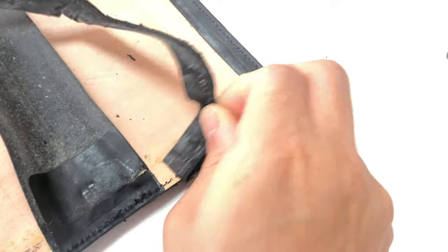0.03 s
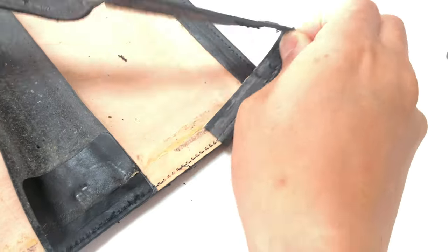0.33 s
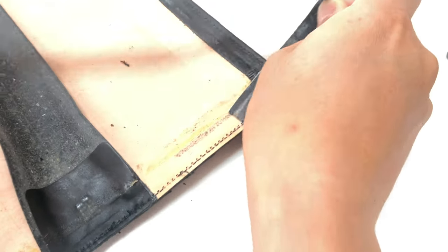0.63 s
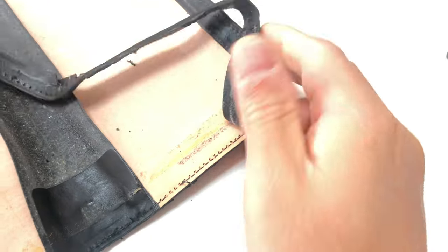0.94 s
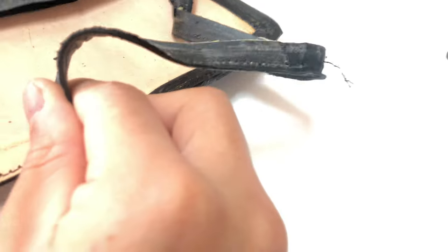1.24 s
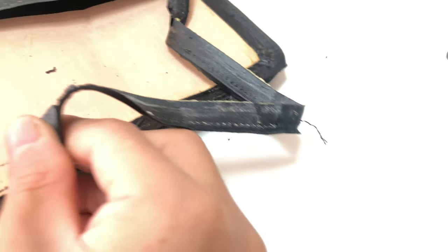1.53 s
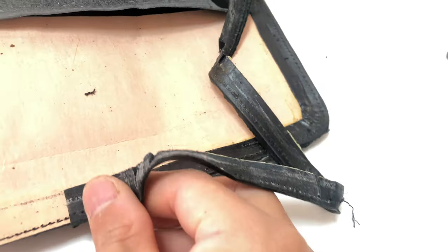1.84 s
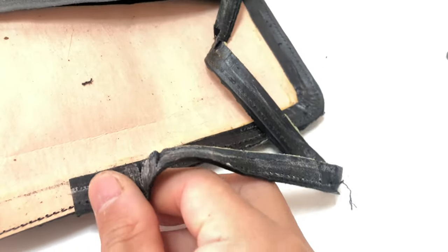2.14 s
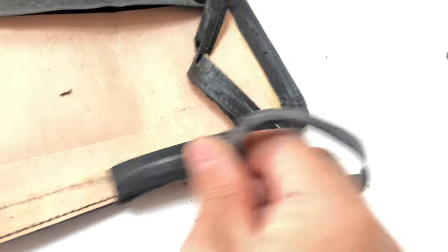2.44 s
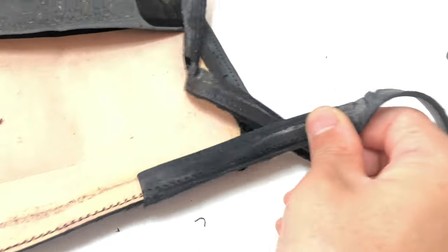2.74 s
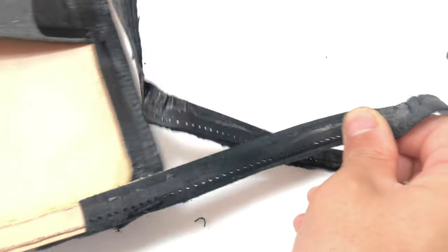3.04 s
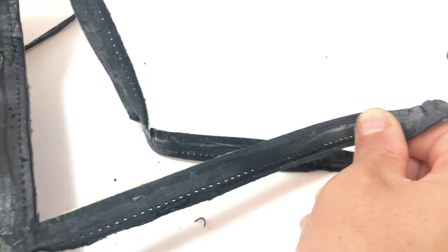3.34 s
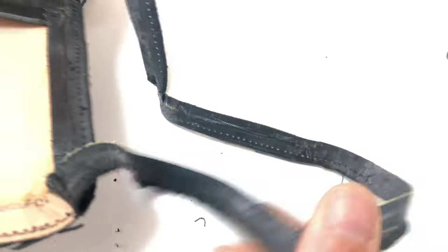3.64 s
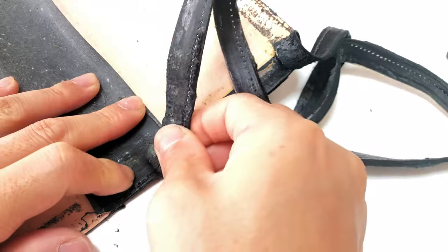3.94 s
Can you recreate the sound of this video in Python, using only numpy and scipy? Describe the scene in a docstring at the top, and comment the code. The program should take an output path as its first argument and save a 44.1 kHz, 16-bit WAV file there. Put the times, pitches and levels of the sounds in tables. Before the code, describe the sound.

Glued edging peels off a leather panel, close up, starting with faint crackling and a few sharp clicks. From about 0.6 to 2 seconds, hands slide and rub softly over the leather with dull bumps. A quick fizzing rip comes at 2.4 seconds, then crackling tugs with sharp snaps, loudest from 3 to 3.2. Soft sliding follows, and a table knock near 4 seconds. Low handling rumble comes and goes.

```python
"""At a work table, close to the microphone, hands peel a glued edging strip off a leather panel.
The glue fails fibre by fibre, in a fizzing rip and then in crackling tugs with sharp snaps, and these
impulses excite the panel's hollow modes. Between pulls, sliding friction of hands and leather gives a
soft hiss. Knocks set the table ringing, and the handling shakes the microphone into a low rumble."""
import sys
import numpy as np
from scipy import signal
from scipy.fft import rfft, irfft
from scipy.io import wavfile
from scipy.ndimage import uniform_filter1d

SR = 44100
rng = np.random.default_rng(int(sys.argv[2]) if len(sys.argv) > 2 else 0)


def transcribe(u):
    """Save the signal u as a 16-bit wav file named by the first command-line argument.

    u: samples, shape (n,) or (channels, n), limited to [-1, 1]; the rate is SR.
    q: integer samples, one column per channel.
    """
    v = np.clip(np.atleast_2d(u).T, -1, 1)
    q = np.round(v * 32767).astype(np.int16)
    wavfile.write(sys.argv[1], SR, q)


N = 176400
T = np.arange(N) / SR


def amp(db):
    """Decibels to gain."""
    return 10 ** (np.asarray(db) / 20)


def unit(x):
    """Scales to rms 1."""
    return x / np.sqrt(np.mean(x ** 2) + 1e-20)


def read(points, hz):
    """Reads a table on a log-frequency axis."""
    f, value = np.transpose(points)
    return np.interp(np.log(hz + 1), np.log(f + 1), value)


def level(rows, axis=1):
    """Gain along a dB curve, fading quickly outside it."""
    c = np.transpose(rows)
    outside = np.maximum(c[0, 0] - T, 0) + np.maximum(T - c[0, -1], 0)
    return amp(np.interp(T, c[0], c[axis])) * np.exp(-outside / 0.041)


def add(mix, s, sound):
    """Mixes a sound in at a time."""
    part = mix[max(round(s * SR), 0):][:len(sound)]
    part += sound[:len(part)]


def colour(x, points):
    """Causal filter with the given spectrum."""
    size = 16384
    log_gain = np.log(amp(read(points, abs(np.fft.fftfreq(size, 1 / SR)))))
    taps = np.fft.ifft(np.exp(np.conj(signal.hilbert(log_gain)))).real[:size // 2]
    return signal.fftconvolve(x, taps)[:len(x)]


def wander(hz):
    """Slow chance of rms 1, up to the given rate."""
    return unit(irfft(rfft(rng.standard_normal(N)) / (1 + (np.fft.rfftfreq(N, 1 / SR) / hz) ** 4), N))


def fibres(per_s, spread_db, clump_db, clump_hz):
    """Poisson process: random clicks of uneven size, swelling and sinking in clumps."""
    size_db = spread_db * np.minimum(rng.exponential(1, N), 4)
    size_db += clump_db * np.clip(wander(clump_hz), -2, 2)
    return amp(size_db) * rng.choice([-1., 1.], N) * (rng.random(N) < per_s / SR)


def stroke(peak, rise, fall, db, flatness=2.2):
    """Bell-shaped envelope: a swell and a fade; flatness above 2 holds the top longer."""
    width = np.where(T < peak, rise, fall)
    return amp(db) * np.exp(-0.75 * abs((T - peak) / width) ** flatness)


# Envelopes of the three pulls (time [s], crackle level [dB], flexing level [dB])
LOOSEN_ENVELOPE = [(0.0, -53.5, -51.5), (0.064, -52.5, -55), (0.088, -51.5, -42), (0.304, -56, -67),
                   (0.366, -52, -52.5), (0.442, -56, -58), (0.466, -55, -46), (0.6, -70, -71)]
RIP_ENVELOPE = [(2.332, -63.5, -64), (2.386, -53.5, -49), (2.408, -47.5, -54), (2.48, -39, -61),
                (2.568, -61.5, -80), (2.598, -63, -45), (2.64, -74, -64)]
TUG_ENVELOPE = [(2.666, -57, -71), (2.728, -46.5, -47), (2.762, -46, -46.5), (2.83, -54, -60),
                (2.934, -57, -79), (3.002, -45, -41.5), (3.078, -47, -52), (3.11, -55.5, -73),
                (3.132, -54.5, -67), (3.14, -49, -33.5), (3.156, -48, -39.5), (3.218, -47.5, -62),
                (3.33, -69, -88)]
# Spectra of each pull's crackle and of the flexing panel (frequency [Hz], level [dB])
LOOSEN_SPECTRUM = [(300, -8), (1000, -8), (1550, -8), (2050, 0.5), (3000, -6.5), (4200, -6.5), (7500, -8.5),
                   (11000, -21), (16000, -39)]
RIP_SPECTRUM = [(180,-13), (400,-9), (950,-9.5), (1800,-8), (2300,-1.5), (2900,-4.5), (3800,-7.5),
                (5500,-4), (7600,-8), (10500,-15.5), (13700,-19.5), (16000,-27)]
TUG_SPECTRUM = [(180,-22), (400,-6.5), (900,-13.5), (1350,-8), (2200,-2.5), (3700,-11), (6500,-7.5),
                (8200,-9.5), (10500,-18.5), (13500,-19), (16000,-29)]
FLEX_SPECTRUM = [(30, -5.5), (60, 3.5), (120, 2), (190, -2.5), (300, -6), (400, -16), (550, -19),
                 (1000, -20), (3000, -50)]


def peeling():
    """Adhesive fracture: the glue gives way in a gentle loosening, one fast rip, then coarse tugs."""
    gentle = fibres(per_s=2200, spread_db=2.5, clump_db=2, clump_hz=70)
    loosening = pull(LOOSEN_ENVELOPE, LOOSEN_SPECTRUM, gentle, crackle_db=-1.5, flex_db=-1)
    fast = fibres(per_s=5700, spread_db=3.5, clump_db=0, clump_hz=199)
    rip = pull(RIP_ENVELOPE, RIP_SPECTRUM, fast, crackle_db=1, flex_db=-7)
    coarse = fibres(per_s=4200, spread_db=3, clump_db=2.5, clump_hz=142)
    tugs = pull(TUG_ENVELOPE, TUG_SPECTRUM, coarse, crackle_db=-2.5, flex_db=-1.5)
    return loosening + rip + tugs


def pull(envelope, spectrum, breaks, crackle_db, flex_db):
    """Acoustic emission: each breaking glue fibre clicks, while the panel flexes in small jerks."""
    jerks = fibres(per_s=640, spread_db=1.5, clump_db=3.5, clump_hz=41)
    crackle = amp(crackle_db) * level(envelope) * unit(colour(breaks, spectrum))
    flexing = amp(flex_db) * level(envelope, axis=2) * unit(colour(jerks, FLEX_SPECTRUM))
    return crackle + flexing


# Glue and stitches snapping (time [s], crack [dB], thud [dB], ring [dB], ring pitch [Hz])
SNAPS = [(0.0882,-35.5,-38,-50,613),(0.113,-60,-53,-62,1950),(0.1477,-35.5,-62,-40,3020),(0.265,-36,-55,-45,2470),(0.3593,-44,-72,-49.5,2000),(1.3468,-47,-53,-51.5,2160),(1.7157,-52,-50.5,-47.5,1510),(2.483,-43,-49,-55,2250),(2.5013,-35,-60,-47,2350),(2.5922,-45.5,-55,-51,1400),(2.667,-41.5,-60,-52.5,2100),(2.7017,-39.5,-54,-52,2100),(2.711,-39.5,-51,-49,2100),(2.7479,-44,-49,-51,2000),(2.758,-37.5,-54,-43.5,2100),(2.7733,-38,-61,-50,2100),(2.7855,-43,-61,-45.5,2000),(2.8478,-39,-59,-62,2100),(2.9653,-34,-45.5,-45.5,1860),(2.988,-38,-50,-60,2100),(2.9971,-36,-49,-46,1850),(2.9989,-33,-42,-42.5,1870),(3.0068,-36,-48,-50,1770),(3.026,-29,-39,-36.5,1770),(3.045,-30,-39,-42,1900),(3.0512,-31.5,-56,-39.5,2050),(3.0734,-30,-53,-45,2000),(3.0859,-33,-45,-43.5,2020),(3.1408,-29,-34.5,-29,1680),(3.167,-31.5,-43.5,-37,1960),(3.1738,-35,-44,-43,2070),(3.2067,-32.5,-41,-47,1990),(3.9668,-41,-42,-62,1600)]
# Spectra of the three parts of a snap (frequency [Hz], level [dB])
CRACK_SPECTRUM = [(200,-18), (1500,-10.5), (3000,1), (4500,0.5), (6500,9.5), (8200,4), (10500,-7.5),
                  (14000,-4.5), (15200,-25), (16000,-37)]
RING_SPECTRUM = [(200,-18), (800,-14), (1300,-3.5), (2100,1), (2800,0.5), (3800,-3), (8000,-50),
                 (16000,-49)]
THUD_SPECTRUM = [(25, 3), (70, -4.5), (170, 1.5), (400, -9), (800, -19.5), (2000, -16), (8000, -77)]


def snaps(lag_s=0.0009, ring_peak_hz=2100):
    """Impulse excitation: each snap cracks, rings the strip at its own pitch and thumps the panel."""
    out = np.zeros(N)
    for start, crack_db, thud_db, ring_db, hz in SNAPS:
        tuned = np.array(RING_SPECTRUM) * [hz / ring_peak_hz, 1]
        crack = amp(crack_db - 6) * release(CRACK_SPECTRUM, chatter_gain=0.71)
        ring = amp(ring_db + 2.5) * release(tuned, chatter_gain=0.71, tail_gain=0.33)
        thud = amp(thud_db + 4) * release(THUD_SPECTRUM, chatter_gain=0.26)
        add(out, start + lag_s, crack + ring + thud)
    return out


def release(spectrum, chatter_gain, tail_gain=0, chatter_s=0.0018, tail_s=0.045):
    """Sudden release of strain: an impulse with a short chatter and an optional ringing tail."""
    t = np.arange(8000) / SR
    chatter, tail = rng.standard_normal((2, len(t))) * np.exp(-t / np.array([[chatter_s], [tail_s]]))
    force = (t == 0) + chatter_gain * chatter / np.linalg.norm(chatter)
    force += tail_gain * tail / np.linalg.norm(tail)
    burst = colour(force, spectrum)
    return np.sqrt(0.002 * SR) * burst / np.linalg.norm(burst[:400])  # equal energy in the first 9 ms


# Hollow modes of the panel (frequency [Hz], level at resonance [dB])
PANEL_MODES = [(1270, 0.5), (1440, 0.5), (1580, -9), (1690, -7.5), (1950, -1), (2090, 2), (2310, 3),
               (2670, -15), (7850, 2), (8200, 3)]


def panel(drive, t60_s=0.1):
    """Forced vibration: tearing and rubbing drive the damped modes of the stiff panel."""
    t = np.arange(SR // 2) / SR
    decay = np.log(1000) / t60_s
    ring = sum(amp(db) * np.cos(2 * np.pi * hz * t) for hz, db in PANEL_MODES) * np.exp(-decay * t)
    return drive + amp(-4.5) * signal.fftconvolve(drive, 2 * decay / SR * ring)[:N]


# Strokes of hands and leather (peak time [s], rise [s], fall [s], level [dB], top of the hiss [Hz])
SLIDES = [(.05,0.23,0.28,-54,9200), (.85,0.14,0.18,-52,10600), (1.07,0.062,0.073,-57.5,7600),
          (1.2,0.12,0.12,-54,9100), (1.385,0.04,0.045,-58,6600), (1.52,0.12,0.35,-56,8700),
          (1.69,.1,0.09,-51.5,9700), (1.85,0.08,0.087,-58.5,9000), (3.49,0.08,0.31,-54.5,9900),
          (3.6,0.13,0.11,-58.5,10000), (3.976,0.017,0.058,-53.5,7800)]
# Spectrum of the hiss (frequency [Hz], level [dB])
SLIDE_SPECTRUM = [(100,-22), (350,-3), (900,-5), (2200,-3), (7800,-3), (13500,-8.5), (16000,-19.5)]


def sliding(shelf_db=-9.5, slow_dulling=0.18):
    """Sliding friction: dense tiny contacts merge into a hiss that reaches higher with speed."""
    contacts = fibres(per_s=20000, spread_db=0.9, clump_db=1.2, clump_hz=60)
    hz, t, hiss = signal.stft(unit(colour(contacts, SLIDE_SPECTRUM)), SR, nperseg=256)
    power = 0
    for peak, rise, fall, db, top_hz in SLIDES:
        speed = np.interp(t, T, stroke(peak, rise, fall, 0))
        corner_hz = top_hz * (1 - slow_dulling * (1 - speed))
        shelf = shelf_db / (1 + (corner_hz / (hz[:, None] + 1)) ** 18)
        power += (speed * amp(db + shelf)) ** 2
    return signal.istft(hiss * np.sqrt(power), SR, nperseg=256)[1][:N]


# Finger strokes on the panel (peak time [s], rise [s], fall [s], level [dB])
RUBS = [(1.162,0.25,0.15,-56.5), (1.57,0.021,0.036,-55), (1.905,0.076,0.031,-54.5),
        (2.597,0.0065,0.023,-52.5)]
# Spectrum of the rubbing (frequency [Hz], level [dB])
RUB_SPECTRUM = [(60,6), (140,5), (330,1), (500,-7), (750,-1), (1400,-8), (1800,-14.5), (8000,-35)]


def rubbing():
    """Stick-slip friction: fingertips catch and let go on the panel in dull pulses."""
    slips = fibres(per_s=1200, spread_db=2, clump_db=2.5, clump_hz=50)
    return unit(colour(slips, RUB_SPECTRUM)) * sum(stroke(*row) for row in RUBS)


# Knocks on the table (time [s], level [dB], attack time [s])
KNOCKS = [(0.088, -40.5, 0.0019), (0.457, -48.5, 0.0028), (1.906, -46.5, 0.007), (2.593, -48.5, 0.00097),
          (3.968, -30.5, 0.0007)]
# Modes of the table top (frequency [Hz], level [dB], T60 [s])
TABLE_MODES = [(332.3, 1.5, 0.29), (398.7, 1, 0.17), (495, -9, 0.088), (590, -6.5, 0.13),
               (658, -2.5, 0.065), (838, -9.5, 0.11), (1420, -18, 0.053)]


def knocks():
    """Free vibration: struck by the panel or a hand, the table top rings in its damped modes."""
    out, t = np.zeros(N), np.arange(SR // 2) / SR
    for start, db, attack_s in KNOCKS:
        ring = sum(amp(mode_db - 60 * t / t60) * np.sin(2 * np.pi * (hz * t + rng.random()))
                   for hz, mode_db, t60 in TABLE_MODES)
        add(out, start, amp(db - 6.5) * (1 - np.exp(-t / attack_s)) * ring)
    return out


# Soft bumps of the hands and the freed strip (time [s], level [dB], frequency [Hz], T60 [s])
BUMPS = [(0.087,-41.5,176,0.15), (1.349,-39,57,0.09), (1.555,-31,34,0.12), (3.142,-30.5,63.4,0.091),
         (3.156,-30.5,123.3,0.18), (3.733,-38.5,33.8,0.33)]


def bumps():
    """Damped oscillation: each push on the panel dies away as one low sinusoid."""
    out, t = np.zeros(N), np.arange(SR // 3) / SR
    for start, db, hz, t60 in BUMPS:
        add(out, start, amp(db - 60 * t / t60) * np.sin(2 * np.pi * hz * t))
    return out


# Envelope of the handling rumble (time [s], level [dB])
RUMBLE_ENVELOPE = [(0.0, -42.5), (0.19, -38.5), (0.26, -46.5), (0.48, -49.5), (0.6, -57), (1.07, -76),
                   (1.11, -45.5), (1.46, -65), (1.57, -46), (1.69, -65), (2.28, -67), (2.43, -49),
                   (2.54, -77), (2.77, -49), (2.92, -61), (3.03, -36.5), (3.12, -50), (3.14, -37.5),
                   (3.42, -64), (3.71, -67), (3.94, -58), (4.0, -36)]
# Spectrum of the rumble (frequency [Hz], level [dB])
RUMBLE_SPECTRUM = [(8,-19), (25,4), (55,4), (80,-12.5), (120,-22), (200,-38), (500,-57), (2000,-59)]
# Wobbles of the microphone mount (peak time [s], rise [s], fall [s], level [dB])
WOBBLES = [(.05,0.049,0.068,-31.5), (1.19,0.055,0.075,-36.5), (1.6,0.13,0.35,-38), (2.6,0.07,0.084,-37)]


def rumble(sway_hz=20, sway_db=-49):
    """Structure-borne sound: the working hands shake the microphone and set its mount wobbling."""
    shaking = colour(rng.standard_normal(N), RUMBLE_SPECTRUM)
    shaking /= np.sqrt(uniform_filter1d(shaking ** 2, size=3000) + 1e-12)  # evens out chance swells
    phase = 2 * np.pi * sway_hz * T + 0.45 * wander(6.6)
    wobble = unit(np.sin(phase)) * sum(stroke(*row) for row in WOBBLES)
    sway = amp(sway_db) * wander(sway_hz)
    return level(RUMBLE_ENVELOPE) * unit(shaking) + wobble + sway


# Reverberation time of the small room (frequency [Hz], T60 [s])
ROOM_T60 = [(100, 0.26), (400, 0.52), (2000, 0.26), (6000, 0.13), (14000, 0.12)]


def room(direct, echoes_per_s=3000, gap_s=0.005):
    """Reverberation: random echoes follow the direct sound, each band dying at its own rate."""
    echoes = rng.standard_normal(SR // 2) * (rng.random(SR // 2) < echoes_per_s / SR)
    hz, t, bands = signal.stft(echoes, SR, nperseg=256)
    decay = amp(-60 * t / read(ROOM_T60, hz)[:, None])
    tail = signal.istft(bands * decay, SR, nperseg=256)[1]
    tail *= np.arange(len(tail)) / SR > gap_s
    return signal.fftconvolve(direct, tail / np.linalg.norm(tail))[:N]


# Spectrum of the room's background (frequency [Hz], level [dB])
ROOM_SPECTRUM = [(30, -14.5), (60, -30.5), (120, -29.5), (200, -33), (600, -36.5), (1400, -39.5),
                 (4000, -42), (8000, -45), (16000, -50.5)]


def room_noise(db=-58.5):
    """Stationary noise: the steady background hiss of the room."""
    return amp(db) * unit(colour(rng.standard_normal(N), ROOM_SPECTRUM))


def scene():
    """Superposition: direct sound, reverberation and background sum at the microphone."""
    direct = sliding() + panel(rubbing() + peeling() + snaps()) + knocks()
    return (direct + amp(-13.5) * room(direct) + bumps() + rumble() + room_noise())[None]


def record(dry):
    """Band limiting: a steep low-pass filter removes the highest treble."""
    lowpass = signal.firwin(511, cutoff=15900, window=("kaiser", 9), fs=SR)
    return signal.oaconvolve(dry, lowpass[None], "same")


dry = scene()
out = record(dry)
transcribe(out)
```